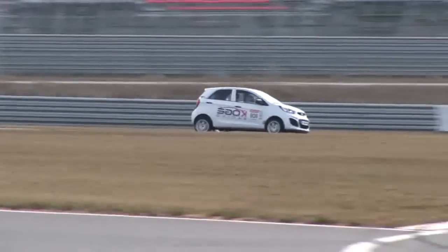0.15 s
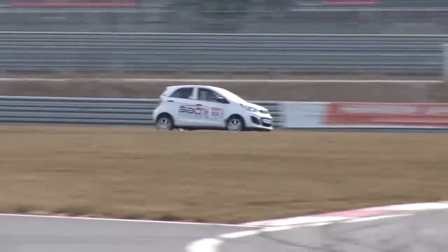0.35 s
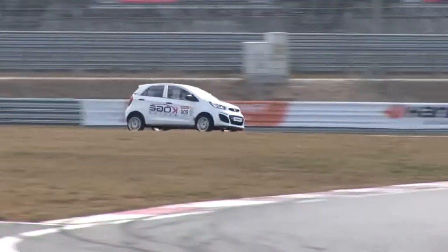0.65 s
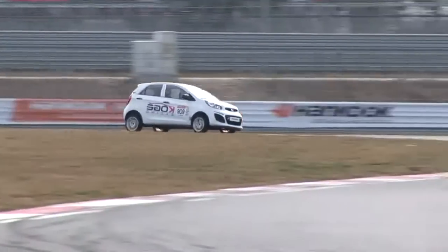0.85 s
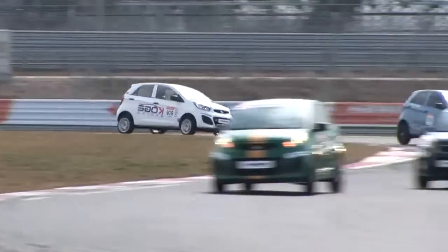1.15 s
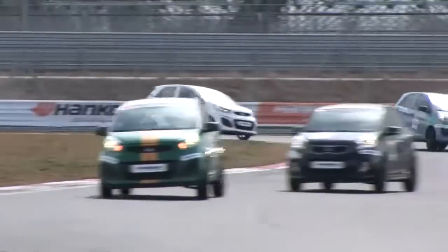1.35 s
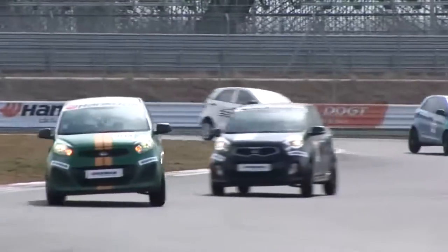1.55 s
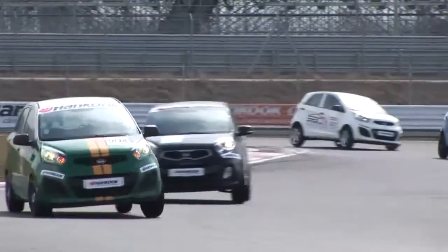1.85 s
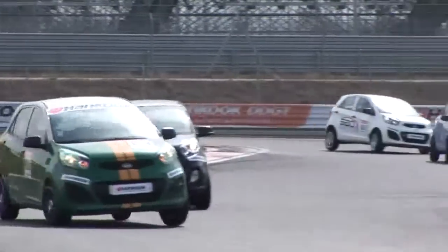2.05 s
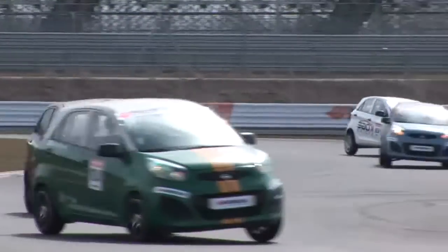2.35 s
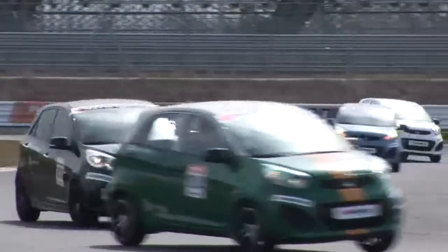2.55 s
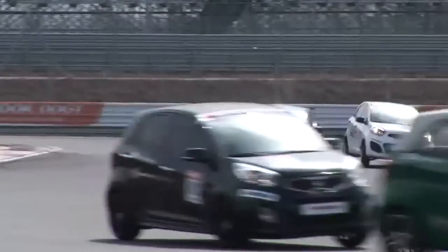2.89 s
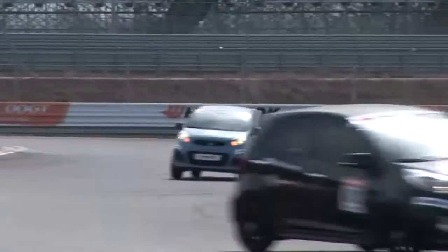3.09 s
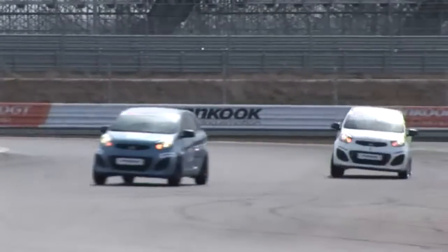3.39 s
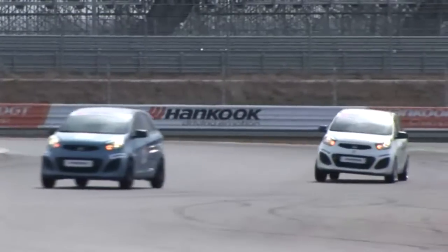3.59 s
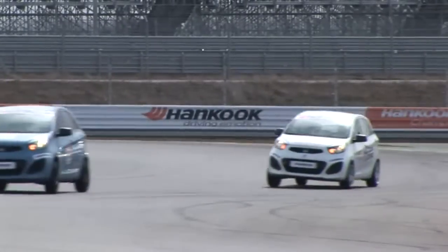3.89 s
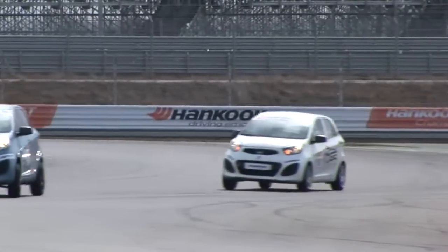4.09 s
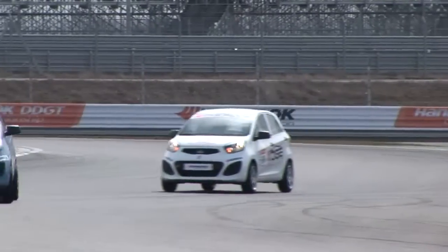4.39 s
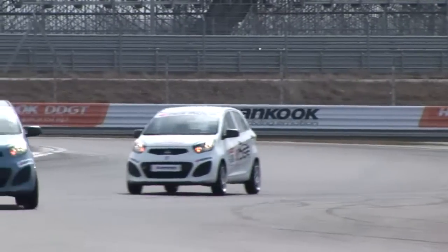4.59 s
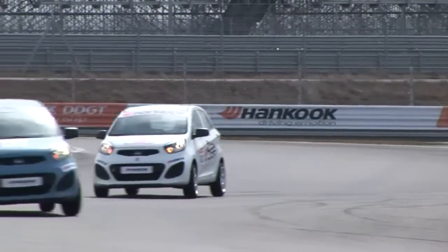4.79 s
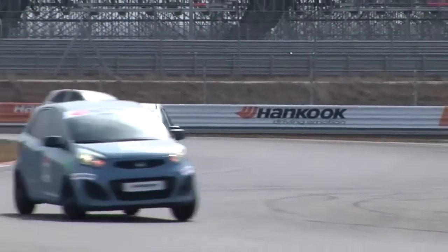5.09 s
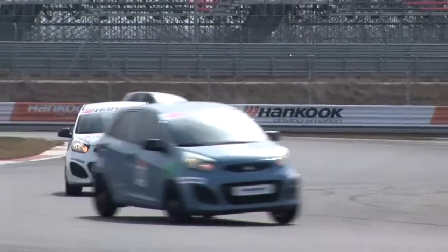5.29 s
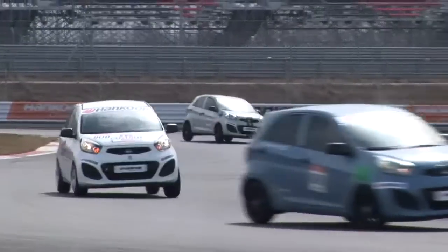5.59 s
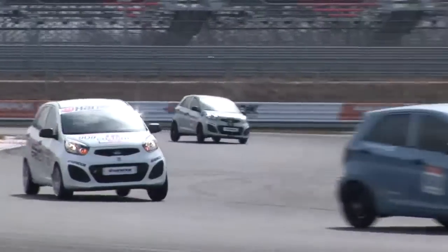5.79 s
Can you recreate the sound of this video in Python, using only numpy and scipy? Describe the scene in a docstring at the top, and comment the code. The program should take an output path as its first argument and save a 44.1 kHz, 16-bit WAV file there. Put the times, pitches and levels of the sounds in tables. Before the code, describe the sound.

Small race cars squeal their tyres through a tight corner, with engines, road roar and wind gusts underneath.

```python
"""A tight corner on a circuit, heard from the trackside as small hatchbacks take it one after another.
Furthest back lie road roar and engines, with wind gusting on the microphone. The sliding tyres scrub,
hiss and howl; in front, their tread blocks stick and slip in a squeal that wobbles with each wheel turn.
The single microphone is fed louder to the left. The scene sounds dull, cut steeply above about 4 kHz,
where only faint patches of thin bright hiss come and go."""
import sys
import numpy as np
from scipy import signal
from scipy.io import wavfile

SR = 44100
rng = np.random.default_rng(int(sys.argv[2]) if len(sys.argv) > 2 else 0)


def waveform_to_disk(signal):
    """Save audio, clipped to [-1, 1], as 16-bit WAV at the path in sys.argv[1]."""
    frames = np.transpose(np.atleast_2d(signal))
    scaled = np.clip(frames, -1, 1) * 32767
    samples = np.round(scaled).astype(np.int16)
    wavfile.write(sys.argv[1], SR, samples)


N = 262035

# wind on the microphone between gusts: (time [s], level [dB])
BREEZE_LEVEL = [(0, -42), (1.0, -47), (1.6, -40.5), (2.3, -45), (2.95, -59.5), (3.6, -61.5), (4.4, -57),
                (4.8, -44), (5.35, -66.5), (5.94, -58.5)]
# gusts on the microphone: (peak time [s], peak level [dB], half length [s])
WIND_GUSTS = [(0.51, -45, .12), (1.21, -35.5, 0.14), (1.75, -38.5, 0.12), (2.16, -32.5, 0.096),
              (2.45, -43, 0.1), (3.22, -48, .15), (3.94, -53.5, 0.11), (4.27, -45.5, .1), (4.62, -44, .12),
              (4.95, -47, 0.053), (5.93, -44, .06)]
# road roar of the pack: (time [s], level [dB])
ROAD_LEVEL = [(0, -42.5), (0.45, -43.5), (0.8, -39.5), (1.25, -39), (1.42, -39.5), (1.8, -39), (2.12, -33),
              (2.45, -39), (3.3, -43), (4.05, -38.5), (4.35, -40), (5.94, -39)]
# spectra of wind, road roar, rubber scrub and tread hiss: (frequency [Hz], relative density [dB])
WIND_SPECTRUM = [(12, -36.5), (20, -6), (86, -8.5), (184, -11.5), (239, -11), (280, -18.5), (300, -3.5),
                 (390, -37), (660, -120)]
ROAD_SPECTRUM = [(60, -13), (110, -6.5), (200, 2), (400, 0), (700, -12.5), (1200, -20), (2200, -21)]
SCRUB_SPECTRUM = [(300, -19.5), (550, 3.5), (900, 2.5), (1050, 0), (1250, -2.5), (1600, 0), (1900, -15),
                  (2400, -33.5)]
HISS_SPECTRUM = [(1400, -5), (1900, -6), (2500, -2.5), (3000, -14.5), (3500, -18), (3900, -9.5),
                 (4400, -24)]
# two colours of thin bright hiss, one spectrum each: (frequency [Hz], relative density [dB])
PATCH_SPECTRA = [
    [(3800, 7), (4400, -5), (4700, -33)],
    [(3900, 9.5), (5000, -12), (5800, -35.5), (6900, 7.5), (7500, -11)],
]
# faint patches of that hiss: (peak time [s], peak level [dB], half length [s], colour [index])
TREBLE_PATCHES = [(1.63, -51.5, 0.22, 0), (4.72, -47, 0.14, 1), (5.15, -54, 0.2, 1), (5.65, -57, 0.099, 1),
                  (5.93, -49.5, 0.25, 1)]
# one curve per engine: (time [s], firing rate [Hz], 1st order [dB], 2nd [dB], 3rd [dB])
ENGINE_CURVES = [
    [(0.0, 164, -44, -44.5, -44), (0.4, 159.2, -50, -44.5, -43.5), (0.74, 152.8, -39, -43.5, -53),
     (1.34, 163.3, -50, -40, -47), (1.75, 167, -46.5, -46.5, -55)],
    [(1.3, 97.6, -43.5, -47.5, -64), (1.6, 93.5, -51, -42.5, -60.5), (2.0, 99, -42, -49, -65.5),
     (2.15, 99.8, -40, -52, -61), (2.4, 103.1, -44.5, -50.5, -46), (2.8, 107, -49.5, -48, -68)],
    [(3.1, 134.5, -49, -53, -49.5), (3.54, 127.9, -57, -49.5, -51), (3.67, 134.2, -45.5, -46.5, -50.5),
     (3.91, 149.6, -40, -47, -44), (4.08, 157.4, -40.5, -56.5, -41), (4.3, 149.8, -50.5, -55, -39)],
    [(4.55, 145.4, -45, -50, -52), (4.66, 133.6, -48, -61, -43.5), (4.82, 132.6, -46.5, -47.5, -66),
     (5.48, 143.2, -40, -47, -54.5), (5.59, 146, -38.5, -43, -67), (5.9, 138.9, -47.5, -66, -63)],
]
# how hard the pack slides sideways: (time [s], scrub level [dB], hiss level [dB])
SLIDE_LEVELS = [(0, -40.5, -57), (0.36, -45, -60), (0.52, -42.5, -52), (0.8, -43.5, -60), (1.25, -38, -59),
                (1.67, -33.5, -45.5), (2.0, -34, -43), (2.18, -27.5, -46.5), (2.38, -33, -60),
                (2.93, -29, -44), (3.22, -26, -42), (3.54, -27.5, -37), (3.94, -27.5, -51.5),
                (4.15, -32, -58), (4.38, -36, -53.5), (4.6, -30, -44.5), (5.04, -39, -51.5),
                (5.34, -33, -51.5), (5.56, -30, -43), (5.94, -32.5, -50.5)]
# tread on the edge of squealing, sinking as the cars slow: (time [s], centre [Hz], level [dB])
HOWL_CURVE = [(1.15, 1086, -54.5), (1.4, 997, -36), (1.9, 932.4, -37), (2.9, 899.5, -29.5),
              (3.2, 875, -38.5), (3.8, 838.3, -42), (4.6, 760.5, -36), (5.1, 734.8, -39.5), (5.3, 734, -55)]
# one curve per squealing tyre: (time [s], slip rate [Hz], 1st harmonic [dB], 2nd [dB], 3rd [dB])
SQUEAL_CURVES = [
    [(0.95, 654.6, -44.5, -56.5, -71), (1.2, 663, -39, -51, -58), (1.39, 666, -33, -48, -57),
     (1.5, 664, -36, -51, -57), (1.6, 668, -27, -47.5, -57), (1.8, 672, -33.5, -46, -62.5)],
    [(1.64, 750.3, -38.5, -56, -60.5), (1.71, 712, -27.5, -48, -57), (1.8, 695.5, -26.5, -37.5, -53),
     (1.93, 674.4, -22.5, -29.5, -38.5), (2.29, 659.5, -17.5, -23.5, -39.5), (2.42, 660.2, -18.5, -17, -31),
     (2.63, 656.6, -19.5, -21.5, -42), (2.8, 656.4, -18.5, -17.5, -30), (2.98, 653.7, -18, -26.5, -38.5),
     (3.04, 651.6, -23.5, -31.5, -43.5), (3.12, 652.5, -19, -23, -29), (3.28, 648, -23.5, -27, -36),
     (3.5, 643.2, -25, -18.5, -32)],
    [(3.07, 632.5, -25, -26.5, -36.5), (3.2, 627.7, -23.5, -27.5, -41), (3.35, 630.5, -17.5, -25.5, -38),
     (3.47, 626.8, -27.5, -23, -28.5), (3.59, 622.7, -18.5, -20.5, -33), (3.74, 610.2, -29, -24, -37),
     (3.85, 608, -22.5, -20.5, -28), (3.97, 617.4, -19.5, -21.5, -31), (4.09, 614, -20, -26, -27),
     (4.2, 598.2, -30, -22.5, -45.5), (4.32, 599.7, -36, -28, -67), (4.44, 600.6, -34, -24.5, -40.5),
     (4.6, 598.3, -36, -28, -49.5), (4.84, 607.5, -35.5, -28.5, -49), (5.03, 644, -34, -47.5, -74),
     (5.17, 680, -38, -47, -67)],
    [(3.5, 647.2, -25, -38.5, -28), (3.63, 637.3, -24, -22, -31), (3.76, 643.2, -26, -27, -40.5),
     (3.88, 620.6, -26.5, -24.5, -41.5), (4.01, 629.3, -36, -24.5, -38), (4.14, 649, -26, -27.5, -48),
     (4.3, 668, -27.5, -57, -72), (4.52, 724.6, -30.5, -44.5, -57)],
    [(5.15, 697.3, -39, -57, -66), (5.29, 673.5, -28, -39, -55), (5.41, 653, -25, -25.5, -31),
     (5.54, 644.5, -22.5, -22, -32.5), (5.68, 632.2, -22.5, -33.5, -34.5), (5.81, 637, -27, -37, -50),
     (5.94, 661.4, -34, -37.5, -61)],
]
# one row per tyre: (wheel rate [turns/s], wobble [share], pitch jitter [Hz], blocks out of step [share])
WHEEL_SETTINGS = [(7.5, .002, 1.47, 0.15), (10.7, 0.016, 2.46, 0.28), (8., 0.0055, 3.14, 0.25),
                  (12, 0.0099, 3.073, 0.42), (9.8, .004, 2.11, 0.2)]

LEFT_OVER_RIGHT_DB, OVERLOAD_AMPLITUDE = 9.0, 0.72
DULL_STOPBAND_HZ, OUTPUT_STOPBAND_HZ = 4350, 7700


def from_db(db):
    """Decibels to gain."""
    return 10 ** (np.asarray(db) / 20)


def unit_rms(x):
    """Scale to an rms of 1."""
    return x / np.sqrt(np.mean(x ** 2) + 1e-20)


def curves(rows):
    """Columns of a time table, sample by sample."""
    times, *columns = np.transpose(rows)
    return [np.interp(np.arange(N) / SR, times, column) for column in columns]


def gate(rows, fade_s):
    """1 while the table lasts, fading in and out just outside it."""
    start, end = rows[0][0], rows[-1][0]
    return np.interp(np.arange(N) / SR, [start - fade_s, start, end, end + fade_s], [0, 1, 1, 0])


def swells(rows):
    """Gain of bell-shaped swells, summed in power."""
    t = np.arange(N) / SR
    bells = [from_db(db) * np.exp(-((t - peak_s) / half_s) ** 2) for peak_s, db, half_s in rows]
    return np.sqrt(sum(bell ** 2 for bell in bells))


def drift(rate_hz):
    """Slow random wander of rms 1: noise through a double one-pole low-pass."""
    step, settle = 10, 4000
    pole = np.exp(-2 * np.pi * rate_hz * step / SR)
    white = rng.standard_normal(N // step + settle + 2)
    slow = signal.lfilter([1], [1, -2 * pole, pole * pole], white)[settle:]
    return np.interp(np.arange(N) / step, np.arange(len(slow)), unit_rms(slow))


def coloured_noise(spectrum, flicker_db, flicker_hz, per_octave=3):
    """Noise bands that flicker partly together, partly each on its own; rms 1."""
    hz, level_db = np.transpose(spectrum)
    edges = hz[0] * 2 ** np.arange(0, np.log2(hz[-1] / hz[0]) + 1 / per_octave, 1 / per_octave)
    together = drift(flicker_hz)
    white = rng.standard_normal((2, N))
    noise = 0
    for k, (low, high) in enumerate(zip(edges, edges[1:])):
        band = signal.sosfilt(signal.butter(2, [low, high], "band", fs=SR, output="sos"), white[k % 2])
        band_db = np.interp(np.log(low * high) / 2, np.log(hz), level_db)
        flicker = together + 1.2 * drift(flicker_hz)
        noise += from_db(band_db + flicker_db * flicker) * band
    return unit_rms(noise)


def harmonics(hz, levels_db, ragged, spread_hz, sag=0):
    """Harmonics of one rate; parts out of step add a noisy skirt, wider on higher ones, flat by sag."""
    phase = 2 * np.pi * np.cumsum(hz) / SR
    tone = 0
    for k, level_db in enumerate(levels_db, 1):
        skirt = (drift(k * spread_hz) + 1j * drift(k * spread_hz)) * np.exp(-1j * k * sag * phase)
        weight = ragged * k ** 0.81
        envelope = (1 + weight * skirt) / np.sqrt(1 + 2 * weight ** 2)
        tone += np.sqrt(2) * from_db(level_db) * np.real(envelope * np.exp(1j * k * phase))
    return tone


def treble_patches(colour):
    """Faint patches of thin bright hiss that come and go above about 4 kHz."""
    hiss = coloured_noise(PATCH_SPECTRA[colour], flicker_db=1.8, flicker_hz=10, per_octave=9)
    hiss = signal.sosfilt(signal.cheby2(8, 50, 3500, "high", fs=SR, output="sos"), hiss)
    return swells([row[:3] for row in TREBLE_PATCHES if row[3] == colour]) * hiss


def road_roar():
    """Low roar of the whole pack rolling on the asphalt."""
    level_db, = curves(ROAD_LEVEL)
    return from_db(level_db) * coloured_noise(ROAD_SPECTRUM, flicker_db=0.77, flicker_hz=4.1)


def wind():
    """Breeze and gusts rumbling on the microphone."""
    breeze_db, = curves(BREEZE_LEVEL)
    gain = np.hypot(from_db(breeze_db), swells(WIND_GUSTS))
    return gain * coloured_noise(WIND_SPECTRUM, flicker_db=1, flicker_hz=11)


def engine(rows):
    """The low exhaust orders of one car, its firing slightly uneven."""
    firing_hz, *levels_db = curves(rows)
    firing_hz += 0.37 * drift(8)
    return gate(rows, fade_s=0.3) * harmonics(firing_hz, levels_db, ragged=0.13, spread_hz=9.1)


def tyre_scrub():
    """Rubber sliding sideways: a rough scrub with tread hiss above it."""
    scrub_db, hiss_db = curves(SLIDE_LEVELS)
    scrub = from_db(scrub_db) * coloured_noise(SCRUB_SPECTRUM, flicker_db=1.38, flicker_hz=29)
    hiss = from_db(hiss_db) * coloured_noise(HISS_SPECTRUM, flicker_db=1.63, flicker_hz=7)
    return scrub + hiss


def tyre_howl():
    """Tread blocks slipping all out of step: noise gathered round a sinking centre."""
    centre_hz, level_db = curves(HOWL_CURVE)
    return gate(HOWL_CURVE, fade_s=0.1) * harmonics(centre_hz, [level_db], ragged=30, spread_hz=97)


def tyre_squeal(rows, turns_per_s, wobble, jitter_hz, ragged):
    """Stick-slip of the tread: the rate creeps up and drops back once per wheel turn."""
    slip_hz, *levels_db = curves(rows)
    levels_db += [levels_db[-1] - 16.5, levels_db[-1] - 27.5]  # 4th and 5th harmonics follow the 3rd
    wheel_angle = 2 * np.pi * np.cumsum(turns_per_s * (1 + 0.063 * drift(1.3))) / SR
    creep = np.sin(wheel_angle) - 0.5 * np.sin(2 * wheel_angle)
    asphalt_grain_hz = jitter_hz * drift(25.2)
    slip_hz = slip_hz * (1 + wobble * creep) + asphalt_grain_hz
    throb = from_db(np.cos(wheel_angle))  # the grip varies round the tyre
    tone = harmonics(slip_hz, levels_db, ragged, spread_hz=42, sag=0.02)
    return gate(rows, fade_s=0.046) * throb * tone


def scene():
    """One trackside microphone, louder on the left; the treble patches sit in the middle."""
    squeals = sum(tyre_squeal(rows, *wheel) for rows, wheel in zip(SQUEAL_CURVES, WHEEL_SETTINGS))
    engines = sum(engine(rows) for rows in ENGINE_CURVES)
    mic = squeals + engines + tyre_howl() + wind() + road_roar() + tyre_scrub()
    mic = mic / (1 + (mic / OVERLOAD_AMPLITUDE) ** 4) ** 0.25  # the input stage rounds the peaks
    dull = signal.sosfilt(signal.cheby2(16, 70, DULL_STOPBAND_HZ, fs=SR, output="sos"), mic)
    right = from_db(-LEFT_OVER_RIGHT_DB)
    balance = np.array([[1], [right]]) * 2 / (1 + right)
    return balance * dull + treble_patches(colour=0) + treble_patches(colour=1)


def record(dry):
    """Low cut at 28 Hz and a steep cut of the top treble."""
    dry = signal.sosfilt(signal.butter(2, 28, "high", fs=SR, output="sos"), dry)
    return signal.sosfilt(signal.cheby2(12, 70, OUTPUT_STOPBAND_HZ, fs=SR, output="sos"), dry)


dry = scene()
out = record(dry)
waveform_to_disk(out)
```